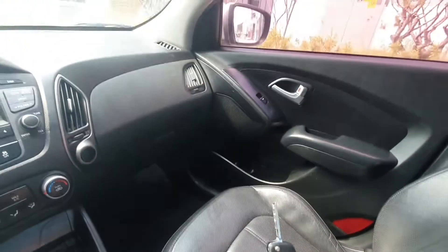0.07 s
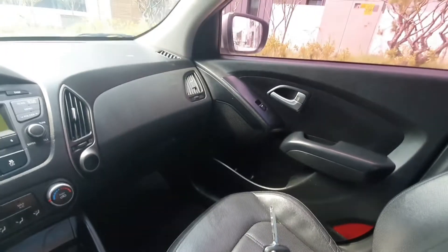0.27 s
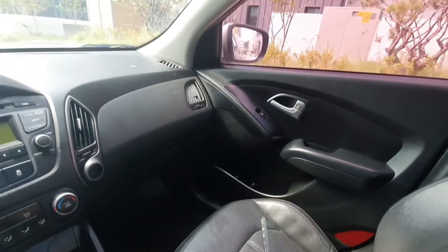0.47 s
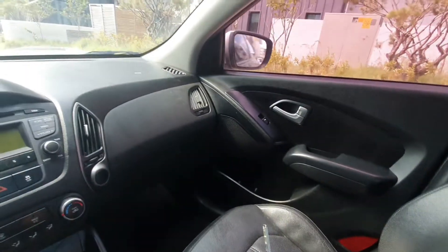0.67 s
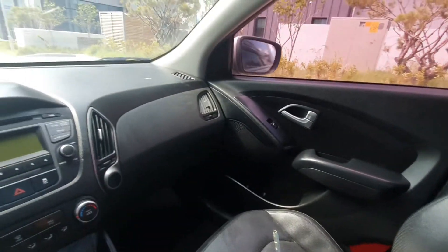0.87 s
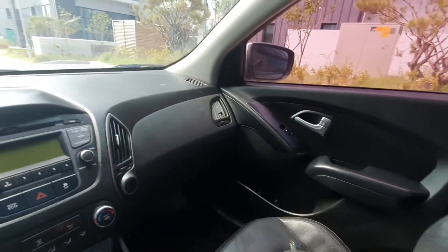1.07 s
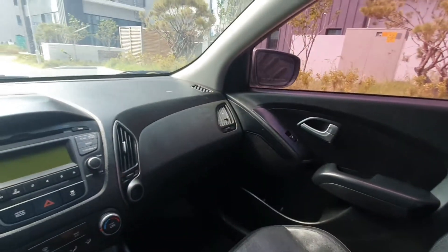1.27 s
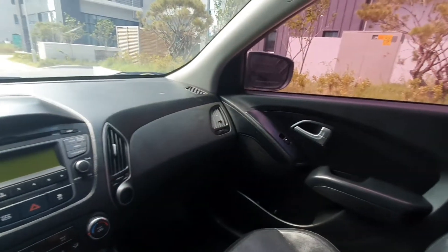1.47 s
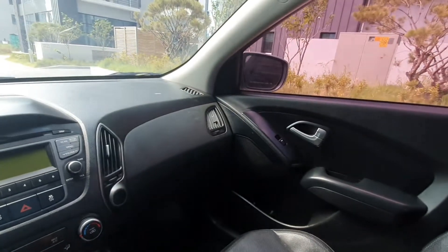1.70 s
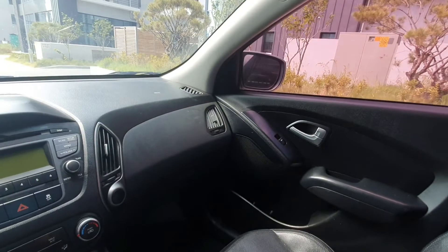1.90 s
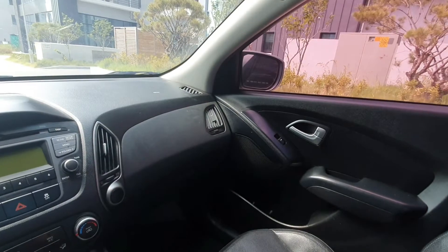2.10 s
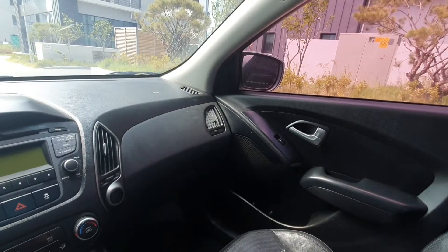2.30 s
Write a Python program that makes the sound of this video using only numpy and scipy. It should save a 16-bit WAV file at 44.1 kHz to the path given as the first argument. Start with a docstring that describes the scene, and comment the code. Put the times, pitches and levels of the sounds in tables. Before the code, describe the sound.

Car door locks snap shut with one hard, booming clack, heard from the driver's seat. The wing mirrors then fold with a faint whirr and land with soft thumps, amid small plastic ticks and a low engine hum.

```python
"""A low engine hum, heard in stereo from the driver's seat of an idling car. Almost at once the door
locks snap shut: their motors run up, the latches knock, and one hard clack booms in the cabin air.
Outside the doors, small geared motors fold the two wing mirrors with a faint whirr, until the housings
meet their stops with a soft thump. Close by, the plastic trim gives small ticks and dull bumps."""
import sys
import numpy as np
from scipy.fft import rfft, irfft, next_fast_len
from scipy.io import wavfile
from scipy.ndimage import map_coordinates

SR = 44100
rng = np.random.default_rng(int(sys.argv[2]) if len(sys.argv) > 2 else 0)


def bounce(signal):
    """Save signal as a 16-bit WAV file at the path given by the first command-line argument."""
    frames = np.transpose(np.atleast_2d(signal))
    limited = np.clip(frames, -1, 1)
    pcm = np.round(limited * 32767).astype(np.int16)
    wavfile.write(sys.argv[1], SR, pcm)


N = 108045


def amp(db):
    """Decibels to gain."""
    return 10 ** (np.asarray(db) / 20)

def along(points, hz):
    """Read (frequency, value) points on a log frequency axis."""
    knots_hz, values = np.transpose(points)
    return np.interp(np.log(hz + 1), np.log(knots_hz + 1), values)

def since(s):
    """Seconds since a moment, zero before it."""
    return np.maximum(np.arange(N) / SR - s, 0)

def fade(t, t60):
    """Exponential decay, 60 dB down after t60 seconds."""
    return np.exp(-np.log(1000) * t / t60)

def rise(t, attack_s):
    """Exponential build-up from 0 to 1."""
    return 1 - np.exp(-t / attack_s)

def pan(db):
    """Gains at the two microphones, the left louder by db."""
    return amp(np.array([[db], [-db]]) / 2)

def wobble(rate):
    """A smooth random curve, rate knots a second."""
    return map_coordinates(rng.standard_normal(N // 100), [np.arange(N) * rate / SR], mode="wrap")

def filtered(x, gain):
    """Apply a gain that depends on frequency."""
    size = next_fast_len(N + SR // 2)
    return irfft(rfft(x, size) * gain(np.fft.rfftfreq(size, 1 / SR)), size)[:, :N]


# How alike the cabin sounds at the two microphones: (frequency [Hz], correlation [-1 to 1])
MIC_LIKENESS = [(60, 0.95), (130, .9), (290, 0.85), (640, .1), (1400, -.1), (4000, 0.004), (15000, 0)]
def mic_phase(hz):
    """Left and right phase shifts: bass reaches the microphones in step, higher sound out of step."""
    spread = np.arccos(np.clip(along(MIC_LIKENESS, hz), -1, 1)) / 2
    return np.array([[1], [-1]]) * spread

def noise(colour, size, ripple_db=0, ripple_hz=109.8):
    """Coloured stereo noise of rms 1, near mono in the bass, with optional narrow resonances."""
    hz = np.fft.rfftfreq(size, 1 / SR)
    spread = mic_phase(hz)[0]
    ripple = map_coordinates(rng.standard_normal(SR // 20), [hz / ripple_hz], mode="wrap")
    ripple *= hz / (hz + 10 * ripple_hz)  # smoother in the bass
    phases = np.exp(2j * np.pi * rng.random((2, len(hz))))
    mid, side = phases * amp(along(colour, hz) + ripple_db * ripple) * [np.cos(spread), np.sin(spread)]
    stereo = irfft([mid + side, mid - side], size)
    return stereo / np.sqrt(np.mean(stereo ** 2) + 1e-20)

def shaft(hz, orders, jitter, waver_db):
    """Unsteady tones on the multiples of a turning shaft."""
    angle = 2 * np.pi * np.cumsum(hz * (1 + jitter * wobble(rate=16))) / SR
    tones = 0
    for order, db in orders:
        gain = np.sqrt(2) * amp(db + waver_db * wobble(rate=9.3))
        phase = rng.uniform(0, 2 * np.pi) + mic_phase(order * np.mean(hz))
        tones += gain * np.sin(order * angle + phase)
    return tones

def modes(table, t):
    """An object's resonances, struck once, each a little stronger or weaker by chance."""
    return sum(amp(db + rng.normal(0, 1)) * fade(t, t60) * np.sin(2 * np.pi * hz * t + mic_phase(hz))
               for hz, db, t60 in table)

def rattle(colour, ring, t):
    """The dense ringing of trim and cabin after a blow; each band dies at its own speed."""
    hz = np.fft.rfftfreq(len(t), 1 / SR)
    spectrum = rfft(noise(colour, size=len(t), ripple_db=3.5))
    centres_hz, t60s = np.transpose(ring)
    cabin_tail = amp(-45.5) * fade(t, t60=.58)
    sound = 0
    for weights, t60 in zip(np.eye(len(ring)), t60s):
        band = irfft(spectrum * along(list(zip(centres_hz, weights)), hz))
        sound += band * (fade(t, t60) + cabin_tail)
    return sound

def play(events, sound, attack_s, treble_hz=3522, peak_octaves=.3):
    """A fresh blow for each row, with its own level, brightness, side and emphasised band."""
    track = np.zeros((2, N + SR))
    t, hz = np.arange(SR // 2) / SR, np.fft.rfftfreq(SR, 1 / SR)
    for s, db, treble_db, side_db, peak_hz, peak_db, *extra in events:
        shelf = treble_db * hz ** 2 / (hz ** 2 + treble_hz ** 2)
        peak = peak_db * np.exp(-(np.log2((hz + 1) / peak_hz) / peak_octaves) ** 2)
        blow = irfft(rfft(sound(t, *extra), SR) * amp(shelf + peak))[:, :len(t)]
        onset = rise(t, attack_s + .00015 * max(-treble_db, 0))  # a duller contact builds more slowly
        track[:, round(s * SR):][:, :len(t)] += amp(db) * pan(side_db) * blow * onset
    return track[:, :N]


# The engine's lowest tone, at the driver's seat: (time [s], level [dB])
FIRING_LEVEL = [(0, -55), (.6, -54.5), (1.05, -56.5), (1.23, -50.5), (1.42, -53.5), (1.6, -64),
                (1.71, -53.5), (1.79, -65), (1.93, -66), (2.45, -60)]
# Fainter engine tones above it: (frequency [multiple of the firing rate], level [dB])
ENGINE_ORDERS = [(1.92, -69), (2, -67), (3.9, -70)]
# Rumble and hiss all round the microphones: (frequency [Hz], level [dB])
RUMBLE_COLOUR = [(15, -14.5), (30, -1), (60, 0), (85, -6.5), (115, -5), (165, -15), (235, -8.5),
                 (300, -18.5), (420, -23.5), (700, -40.5), (1500, -39), (2500, -44.5), (7500, -53.5),
                 (11000, -48), (15500, -44.5)]
def idle(firing_hz=59.1):
    """The idling engine fills the cabin with a wavering hum, over rumble and faint hiss."""
    firing_db = np.interp(since(0), *np.transpose(FIRING_LEVEL))
    firing = shaft(firing_hz, [(1, firing_db)], jitter=.02, waver_db=2.5)
    overtones = shaft(firing_hz, ENGINE_ORDERS, jitter=.02, waver_db=2.5)
    return firing + overtones + amp(-57.5) * noise(RUMBLE_COLOUR, size=N)


# Spectra of a tick's contact and of the plastic ringing after it: (frequency [Hz], level [dB])
SNAP_SPECTRUM = [(1000, -6), (3300, 0), (6000, -8), (13000, -3)]
TICK_SPECTRUM = [(200, -6), (850, 4), (1050, -1), (1700, 3.5), (2400, -5.5), (3700, -5), (5500, -11),
                 (7500, -17), (9800, -9), (15300, -10)]
# How long the plastic rings: (frequency [Hz], t60 [s])
TICK_DECAY = [(300, 0.067), (3000, .135), (14000, .14)]
def tick(t, snap_db):
    """A light plastic contact: an instant snap, then the ringing of the trim."""
    snap = amp(snap_db) * fade(t, t60=.014) * noise(SNAP_SPECTRUM, size=len(t))
    return snap + rattle(TICK_SPECTRUM, TICK_DECAY, t) * rise(t, attack_s=.002)


# Contacts in the trim, close by and mostly to the left:
# (time [s], level [dB], treble [dB], left-right [dB], emphasis [Hz], emphasis [dB])
TRIM_BUMPS = [(.73, -52, 2, -1, 1500, 7), (.856, -42, 5.5, 4, 230, 4), (.864, -41.5, 8, 0.5, 2000, 6),
              (1.975, -56, -25, 1.5, 263, 7), (2.04, -52, -28, 0, 300, 8.5),
              (2.134, -46.5, -18, 2.5, 1100, 4), (2.152, -55.5, 1, 1.5, 2700, 9)]
TRIM_CREAKS = [(2.037, -57, 0, 2.5, 1700, 0)]
TRIM_TICKS = [(.404, -54.5, -0.5, 4.5, 3800, 7, 2), (.709, -62, -8, 2, 900, 4, -20),
              (.721, -56, -4.5, 3.5, 12000, 12, -10), (1.404, -53, -4, 2, 1700, 2, -4),
              (1.407, -50.5, -15, 2, 850, 8, -20), (2.251, -69, -3, 3, 3300, 3, -20),
              (2.273, -63.5, 0, 6, 3300, 7, 7)]  # with a last column (snap [dB])
# Spectra of a dull bump and of the creak: (frequency [Hz], level [dB])
BUMP_SPECTRUM = [(60, -7.5), (150, -2.5), (250, 5.5), (420, -9), (570, 2), (800, -10), (1200, -18),
                 (2000, -23.5), (4000, -39), (6000, -61), (15000, -62)]
CREAK_SPECTRUM = [(900, -25), (1700, 16), (2200, -5), (3000, -28), (9000, -47.5)]
# How long each rings: (frequency [Hz], t60 [s])
BUMP_DECAY = [(150, 0.27), (1000, .17), (5000, 0.22)]
CREAK_DECAY = [(1000, 0.087), (3000, 0.063)]
def trim():
    """Plastic trim ticks and bumps near the microphones, and creaks once as the mirrors seat."""
    ticks = play(TRIM_TICKS, tick, attack_s=.0004)
    bumps = play(TRIM_BUMPS, lambda t: rattle(BUMP_SPECTRUM, BUMP_DECAY, t), attack_s=.0015)
    creak = play(TRIM_CREAKS, lambda t: rattle(CREAK_SPECTRUM, CREAK_DECAY, t), attack_s=.003)
    return ticks + bumps + creak


# The mirror motors, one outside the driver's door and one across the car:
# (time [s], near shaft [Hz], far shaft [Hz], near level [dB], far level [dB])
MIRROR_MOTORS = [(.38, 66.7, 68.2, -66, -66), (.51, 65.8, 67.7, -71, -69), (.68, 66.8, 67.2, -65, -69),
                 (.9, 67.3, 67.1, -66, -68), (1.1, 68.5, 67.5, -65, -64), (1.22, 68.1, 65.9, -68, -68),
                 (1.41, 67.3, 67.7, -68, -62), (1.53, 68, 68.8, -72, -66), (1.65, 69, 69.3, -66, -67),
                 (1.73, 68.8, 67.4, -67, -67), (1.9, 68.3, 66.7, -69, -69), (2.04, 66.8, 67, -61, -68),
                 (2.13, 65.6, 66, -59, -69)]
# Each motor's whine: (frequency [multiple of the shaft rate], level [dB])
NEAR_WHINE = [(8, -14), (9, -2.5), (10, -13.5), (18, -23), (21, -25), (25, -27)]
FAR_WHINE = [(8, -12), (11, -6.5), (12, -16), (13, -17), (19, -19), (24, -22)]
# Gear noise as it comes through the doors: (frequency [Hz], level [dB])
GEAR_SPECTRUM = [(200, -24), (440, -14), (620, 3), (790, -1.5), (1000, -17), (1300, -4.5), (1470, -13.5),
                 (1700, -11.5), (2200, -34.5), (4000, -37), (9000, -52.5)]
def mirror_motors(on_s=.3, off_s=2.19, ramp_s=.06):
    """Two small geared motors, muffled by the doors; the near one strains at the end of its travel."""
    t = since(0)
    times, *columns = np.transpose(MIRROR_MOTORS)
    near_hz, far_hz, near_db, far_db = [np.interp(t, times, column) for column in columns]
    running = np.clip(np.minimum(t - on_s, off_s - t) / ramp_s, 0, 1)
    near = amp(near_db) * shaft(near_hz, NEAR_WHINE, jitter=.007, waver_db=3)
    far = amp(far_db) * shaft(far_hz, FAR_WHINE, jitter=.007, waver_db=3)
    gears = amp(-67.5 - 2.2 * t) * noise(GEAR_SPECTRUM, size=N)
    return running * pan(db=1) * (near + far + gears)


# The mirrors landing, faint from inside the car:
# (time [s], level [dB], treble [dB], left-right [dB], emphasis [Hz], emphasis [dB])
MIRROR_STOPS = [(2.132, -50.5, -8, 2, 600, 2), (2.149, -53, 0, 2, 1200, 5)]
# Resonances of a mirror housing: (frequency [Hz], level [dB], t60 [s])
HOUSING_MODES = [(297, 2, .18), (352, -1, .15), (548, -3, .15), (650, -4, .15), (702, -3, .14),
                 (1125, -6, .11), (1280, -9, .11)]
def mirror_stops():
    """The two housings meet their stops and ring briefly."""
    return play(MIRROR_STOPS, lambda t: modes(HOUSING_MODES, t), attack_s=.001)


# Booms of the air around the microphones: (time [s], frequency [Hz], level [dB], attack [s], t60 [s])
CABIN_BOOMS = [(.297, 84.3, -22, 0.004, 0.13), (.301, 305, -28, .001, .08), (.321, 84.3, -29, .003, .13),
               (0.359, 108.2, -33, 0.0035, 0.16), (0.429, 78, -38.5, 0.0046, 0.16),
               (1.965, 111, -28.5, 0.02, 0.21), (2.06, 89.7, -35.5, .008, 0.16),
               (2.132, 57.8, -26, 0.0044, 0.36), (2.2, 63.7, -28.5, 0.0033, 0.23),
               (2.25, 61.2, -25.5, 0.011, 0.27)]
def booms():
    """Thumps of the locks and mirrors set the closed cabin's air swinging."""
    air = 0
    for s, hz, db, attack_s, t60 in CABIN_BOOMS:
        t = since(s)
        air += amp(db) * np.sin(2 * np.pi * hz * t) * rise(t, attack_s) * fade(t, t60)
    return air


# Spectrum of a lock blow inside the cabin: (frequency [Hz], level [dB])
CLACK_SPECTRUM = [(40, -25.5), (110, -3.5), (300, -0.5), (450, -6), (720, 1), (1700, -4), (2300, -8.5),
                  (3200, -10.5), (4800, -14.5), (8500, -18), (9200, -14), (11000, -15), (13300, -19.5),
                  (15200, -18)]
# How long the trim rings after it: (frequency [Hz], t60 [s])
CLACK_DECAY = [(100, 0.31), (600, .125), (2000, 0.088), (5000, .085), (14000, 0.082)]
# Resonances of door panel and latch: (frequency [Hz], level [dB], t60 [s])
DOOR_MODES = [(115.2, -17, 0.17), (188, -20, .18), (225, -12.5, .18), (298, -20, 0.11), (393, -23, .15),
              (515, -19, .15), (588, -12, .12), (788, -9, .13), (834, -13, .12), (988, -14, 0.1),
              (1250, 1, .015), (1362, -18, .1), (1717, -15, 0.076), (3165, -22, 0.11), (9070, -15, .06),
              (9213, -15, .07)]
def clack(t):
    """One lock blow: the crack of first contact, the door's modes and the rattle of the trim."""
    crack = amp(-2.5) * fade(t, t60=.014) * noise(CLACK_SPECTRUM, size=len(t))
    return crack + modes(DOOR_MODES, t) + rattle(CLACK_SPECTRUM, CLACK_DECAY, t)


# Lock motors scraping up to speed inside the doors: (frequency [Hz], level [dB])
RUN_UP_SPECTRUM = [(150, 3), (900, 0), (2000, -2.5), (5000, -5.5), (8000, -15), (10000, -8.5),
                   (15000, -10.5)]
# Lock parts hitting their stops, in the doors around the seat:
# (time [s], level [dB], treble [dB], left-right [dB], emphasis [Hz], emphasis [dB])
LOCK_BLOWS = [(.2215, -25.5, -13, -1, 1000, 3), (.233, -32, -13, -1.5, 700, 3),
              (.2405, -37.5, -4, 1.5, 12000, 10), (.2505, -34, 2, 1, 15000, 9),
              (.258, -16.5, 3, 2.5, 1300, 2), (.2656, -25, -4.5, -0.5, 780, 4),
              (.272, -29.5, -10.5, 1, 1000, 1)]
# Balance of the locks between the microphones: (frequency [Hz], left-right [dB])
LOCK_BALANCE = [(100, -1.5), (380, -4), (700, 0.5), (2000, 1), (4400, -2.5), (8000, 0), (15000, 2)]
def locks(start_s=.198, full_speed_s=.24, swell_db_per_s=210):
    """The actuators run up and throw the latches; each band favours one microphone."""
    t = since(start_s)
    swell_db = -54.5 + swell_db_per_s * np.minimum(t, full_speed_s - start_s)
    envelope = (t > 0) * amp(swell_db) * fade(since(full_speed_s), t60=.05)
    run_up = envelope * noise(RUN_UP_SPECTRUM, size=N)
    latches = play(LOCK_BLOWS, clack, attack_s=.00062)
    return filtered(run_up + latches, lambda hz: amp(np.outer([1, -1], along(LOCK_BALANCE, hz)) / 2))


def scene():
    """Everything that reaches the microphone pair at the driver's seat."""
    return locks() + trim() + booms() + mirror_motors() + mirror_stops() + idle()

def record(dry, low_cut_hz=28, top_hz=16300):
    """The recorder thins the deepest bass and keeps nothing above its band limit."""
    lean = filtered(dry, lambda hz: hz ** 4 / (hz ** 4 + low_cut_hz ** 4))
    return filtered(lean, lambda hz: np.clip((top_hz - hz) / 600, 0, 1) ** 2)


dry = scene()
out = record(dry)
bounce(out)
```